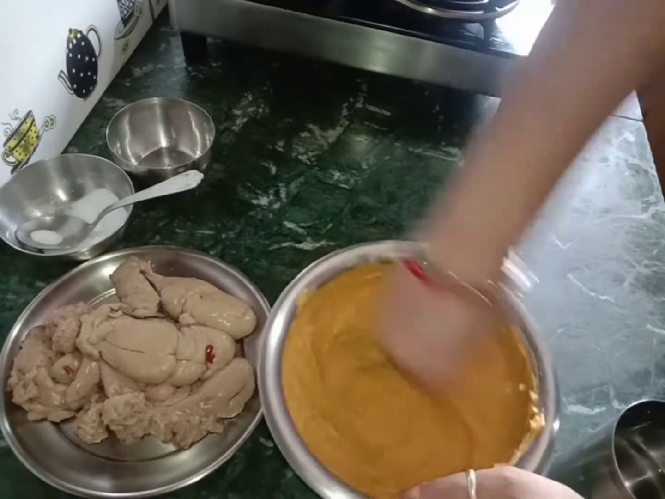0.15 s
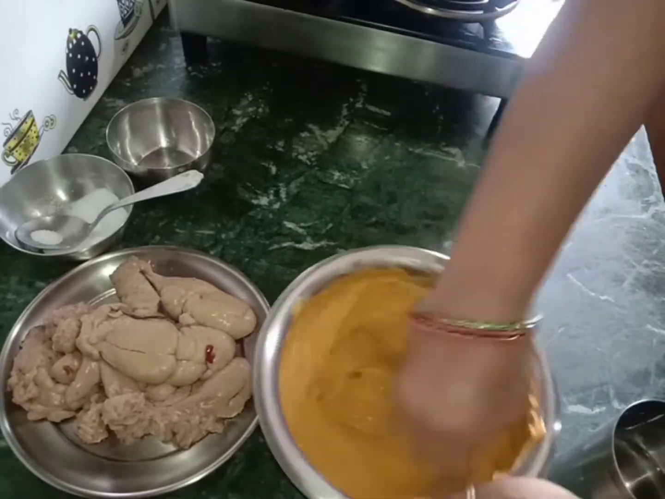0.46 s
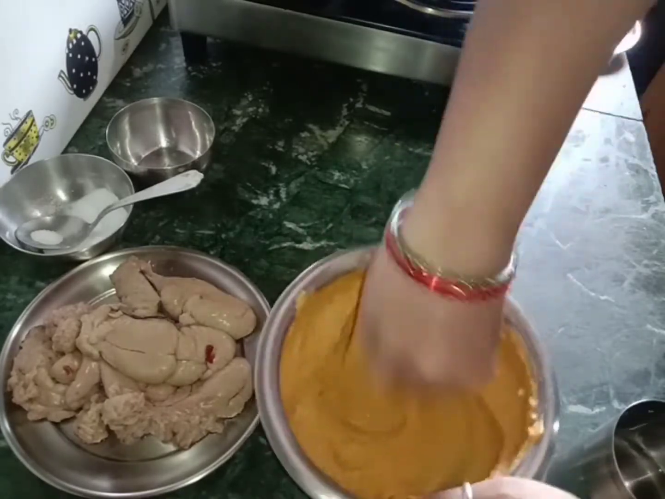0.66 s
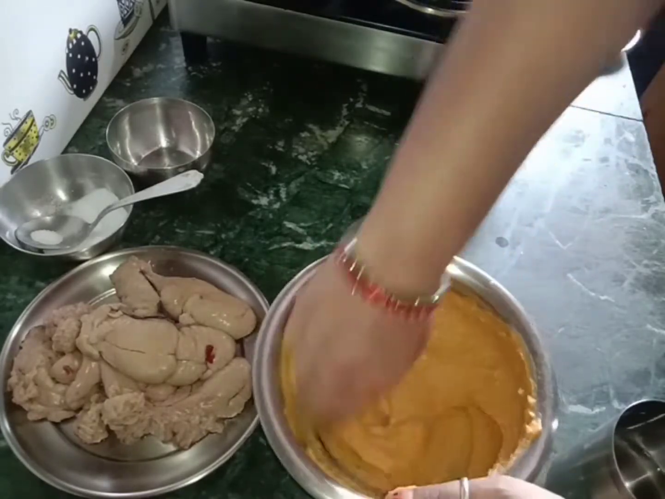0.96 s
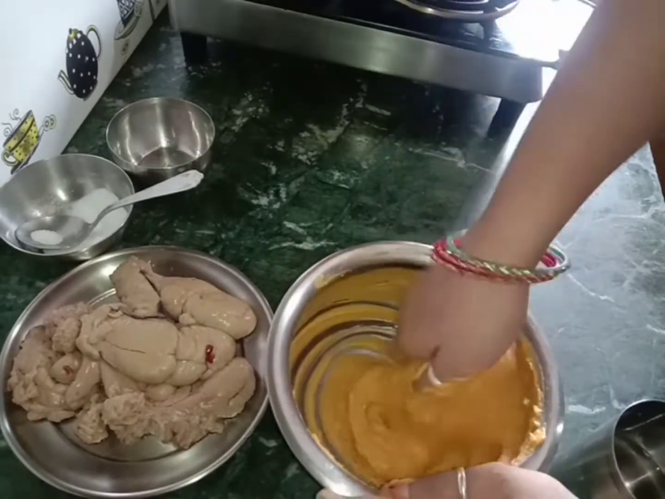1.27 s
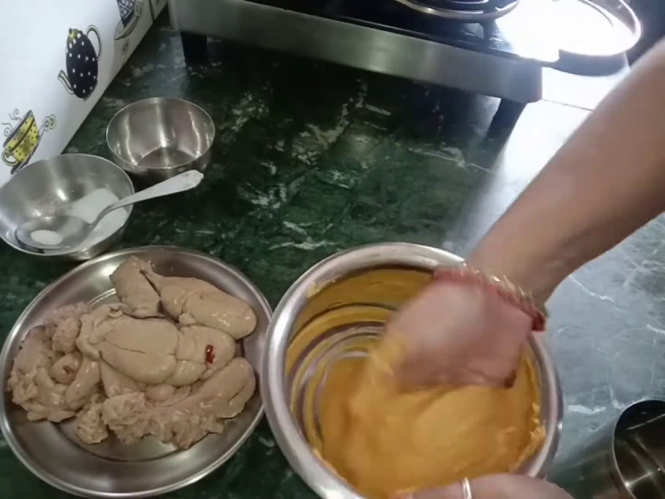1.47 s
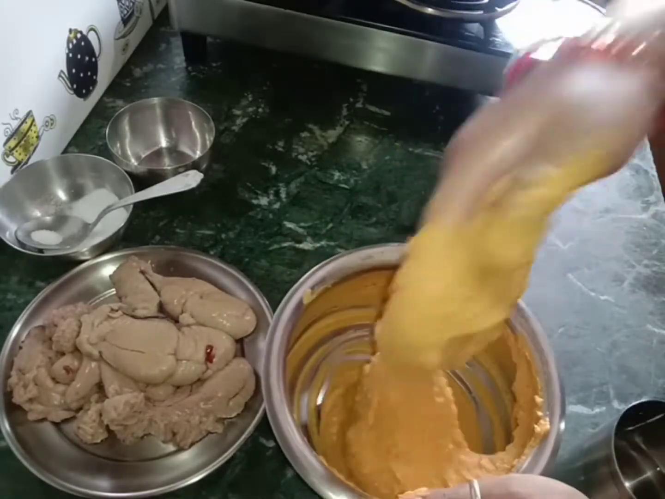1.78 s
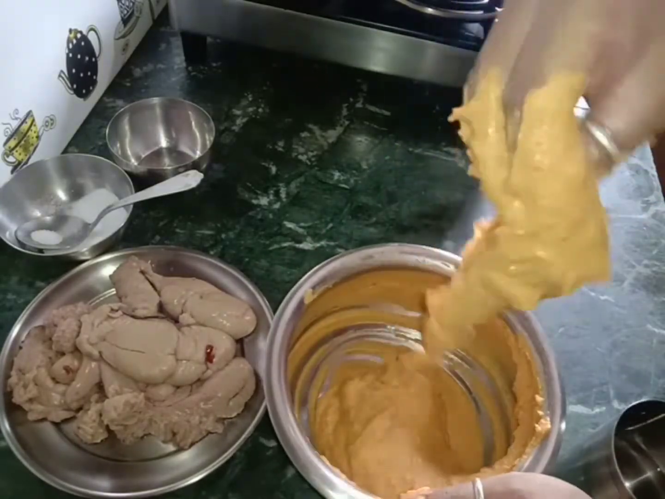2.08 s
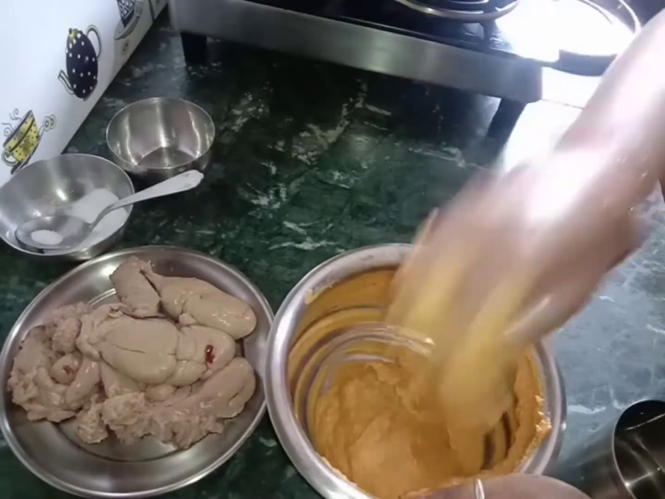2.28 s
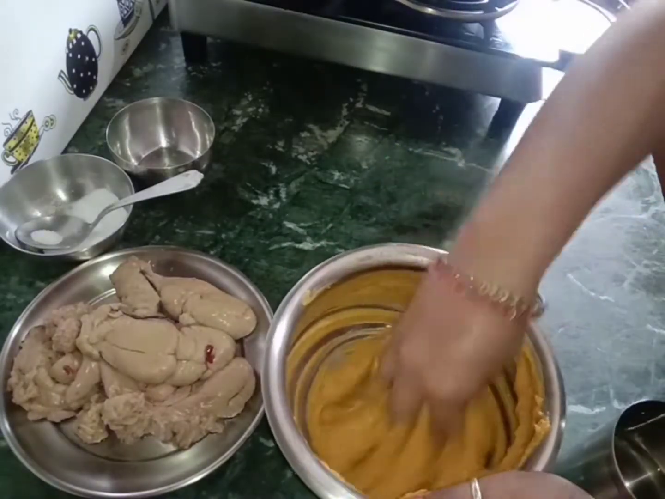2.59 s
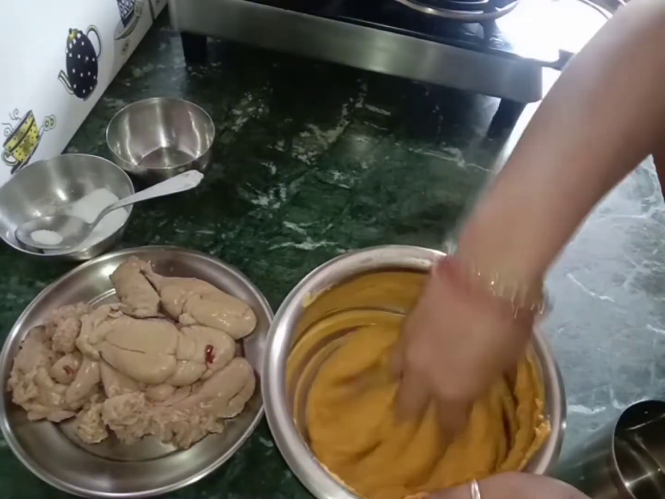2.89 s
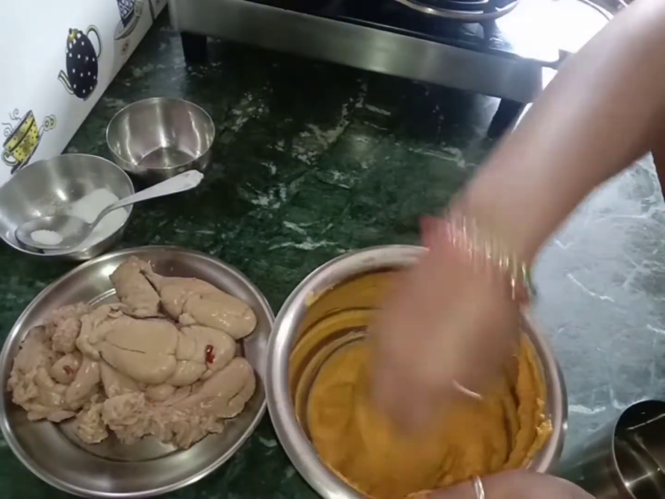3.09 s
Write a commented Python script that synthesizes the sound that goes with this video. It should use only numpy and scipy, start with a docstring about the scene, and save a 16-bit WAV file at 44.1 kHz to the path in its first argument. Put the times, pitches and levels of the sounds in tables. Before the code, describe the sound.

Thick batter is beaten by hand in a steel bowl, close and near-mono in a small kitchen with a short tail. Over unsteady room noise and swelling low hum, faint swishes give way to small wet clicks from 0.35 s, sharper near 0.9 and 1.05. At 1.35 the bowl knocks and chatters on stone. After quieter smacks, hard bright knocks hit at 2.5 and 2.8, then a heavy, hollow palm slap at 3.07.

```python
"""Thick batter is beaten by hand in a steel bowl on a stone counter in a small kitchen, heard near-mono.
Over wavering room noise and a low swelling hum (noise through resonances), the hand drags faint swishes.
Smacks (bursts of noise) click from 0.35 s; near 1.35 s the bowl knocks (ringing modes) and chatters on stone.
Harder knocks and chatter come at 2.5 and 2.8 s, then the strongest palm slap (damped pops) at 3.07 s.
Close sounds feed a short diffuse kitchen tail, and the microphone rounds the peaks."""
import sys
import numpy as np
from scipy import signal
from scipy.fft import rfft, irfft
from scipy.io import wavfile

SR = 44100
rng = np.random.default_rng(int(sys.argv[2]) if len(sys.argv) > 2 else 0)


def master_out(mix):
    """Clip the mix to full scale and print it as 16-bit PCM to the path in sys.argv[1]."""
    frames = np.transpose(np.atleast_2d(mix))
    ceiling = np.clip(frames, -1, 1)
    pcm = np.round(ceiling * 32767).astype(np.int16)
    wavfile.write(sys.argv[1], SR, pcm)


def magnitude_from_level(level_db):
    """Linear magnitude for a level in decibels (20 dB per decade)."""
    exponent = np.asarray(level_db, float) / 20
    return 10 ** exponent


N = 143325
SPAN = 13230   # samples of one event


def rms_one(x):
    """Scale to rms 1."""
    return x / np.sqrt(np.mean(x ** 2) + 1e-20)


def in_time(rows):
    """A (s, value) curve at every sample."""
    return np.interp(np.arange(N) / SR, *np.transpose(rows))


def at_hz(points, hz):
    """A (Hz, value) table read on a log frequency axis."""
    table_hz, values = np.transpose(points)
    return np.interp(np.log(np.maximum(hz, 1)), np.log(table_hz), values)


def colour(x, points):
    """Shape the spectrum by a (Hz, dB) table."""
    size = x.shape[-1]
    hz = np.arange(size // 2 + 1) * SR / size
    return irfft(rfft(x) * magnitude_from_level(at_hz(points, hz)), size)


def band(x, low_hz, high_hz):
    """Keep only what lies between two frequencies."""
    return signal.sosfilt(signal.butter(2, [low_hz, high_hz], "band", fs=SR, output="sos"), x)


def treble(x):
    """Keep only what lies above 2000 Hz, the range of cracks, hisses and smacks."""
    return signal.sosfilt(signal.butter(2, 2000, "high", fs=SR, output="sos"), x)


def drift(rate_hz):
    """Slow random wandering of spread 1, made at every 40th sample and joined by lines."""
    r = np.exp(-80 * np.pi * rate_hz / SR)
    noise = rng.standard_normal(N // 40 + 2002)
    slow = signal.lfilter([1], [1, -2 * r, r * r], noise)[2000:]   # past the filter's start
    return np.interp(np.arange(N) / 40, np.arange(len(slow)), rms_one(slow - slow.mean()))


def ring(clicks, hz, t60):
    """A damped resonance: a unit click sets a sine of about height 1 ringing, down 60 dB in t60."""
    r, w = magnitude_from_level(-60 / (t60 * SR)), 2 * np.pi * hz / SR
    return signal.lfilter([0, np.sin(w)], [1, -2 * r * np.cos(w), r * r], clicks + 1e-18)


def resonant_noise(size, hz, width_hz, second):
    """Noise through one resonance twice, the second pass with its decay time scaled by `second`."""
    t60 = np.log(1000) / np.pi / width_hz
    return ring(ring(rng.standard_normal(size), hz, t60), hz, t60 * second)


def dying(t60, size=SPAN):
    """An exponential fall of 60 dB in t60."""
    return magnitude_from_level(-60 * np.arange(size) / SR / max(t60, .001))


def add(out, s, sound, room_db):
    """Lay a fading sound into the direct row and, offset by room_db, into the row sent to the room."""
    i = int(s * SR)
    size = min(len(sound), N - i)
    faded = sound * np.linspace(1, 0, len(sound))
    out[:, i:i + size] += faded[:size] * magnitude_from_level(np.array([[0], [room_db]]))


def air():
    """Room noise in overlapping half-octave patches whose levels flicker; above 1500 Hz it also swells."""
    # spectrum of the room noise: hz, relative level_db (per Hz)
    air_spectrum = [(30, -22.5), (70, -10.5), (130, -2.5), (240, -13), (700, -14), (1220, -20.5),
                    (3000, -29.5), (7300, -32), (8500, -48.5), (10500, -53.5), (13500, -56.5), (15000, -44),
                    (16000, -54)]
    # swell of its treble: time_s, relative level_db
    treble_swell = [(0, 4.5), (.15, 5.5), (.35, 1.6), (1.2, 0), (2.2, -3), (2.7, 5.5), (3.0, 9), (3.25, -3)]
    level_db, flicker_db, flicker_hz = -51.5, 3.5, 10.0
    noise = rms_one(colour(rng.standard_normal(N + N % 2), air_spectrum))[:N]
    spectrum = rfft(noise)
    hz = np.maximum(np.arange(N // 2 + 1) * SR / N, 30)
    swell_db = in_time(treble_swell)
    out = 0
    for centre_hz in 30 * 2. ** np.arange(0, 10, .5):
        share = np.clip(1 - 2 * abs(np.log2(hz / centre_hz)), 0, 1)
        patch_db = flicker_db * drift(flicker_hz) + (swell_db if centre_hz > 1500 else 0)
        out = out + irfft(spectrum * share, N) * magnitude_from_level(patch_db)
    return out * magnitude_from_level(level_db)


def drones():
    """Noise twice through narrow resonances; the hum near 148 Hz swells on a curve, the others waver."""
    # resonances in the room noise, low to high: pitch_hz, width_hz, level_db (rms before wavering)
    resonances = [(96.6, 4.8, -58), (147.9, 17.3, -53.5), (1247, 108, -60.5), (2150, 30, -70.5),
                  (6030, 57, -79)]
    # swell of the hum, only its shape is used: time_s, level_db
    hum_swell = [(0, -65), (.09, -38.5), (.22, -72.5), (.42, -40.5), (.53, -55.5), (.68, -41.5), (.8, -47),
                 (1.0, -70.5), (1.15, -46), (1.25, -57.5), (1.42, -42.5), (1.62, -73.5), (1.74, -44.5),
                 (1.88, -49), (2.2, -65), (2.5, -46.5), (2.75, -55.5), (3.0, -43.5), (3.25, -51)]
    waver_db, waver_hz = 3.5, 5.7
    hum_hz, hum_db = resonances[1][0], in_time(hum_swell)
    out = 0
    for hz, width_hz, db in resonances:
        tone = rms_one(resonant_noise(N + SR, hz, width_hz, .5)[SR:])   # past the build-up
        change_db = hum_db - hum_db.mean() if hz == hum_hz else waver_db * drift(waver_hz)
        out = out + tone * magnitude_from_level(db + change_db)
    return out


def kitchen(x):
    """A diffuse tail after 3 ms: octave bands of noise, each dying at its own rate."""
    # decay of the kitchen: hz, t60_s
    room_decay = [(300, 0.24), (1300, 0.31), (5510, 0.37), (14600, 0.1)]
    tail = 0
    for hz in 110 * 2. ** np.arange(8):
        noise = band(rng.standard_normal(22050), hz / 2 ** .5, hz * 2 ** .5)
        tail = tail + noise * dying(at_hz(room_decay, hz), size=22050)
    tail = np.append(np.zeros(int(.003 * SR)), tail / np.sqrt(np.sum(tail ** 2)))
    return 2 * signal.fftconvolve(x, tail)[:N]


def swishes():
    """Narrow noise swells: noise twice through one resonance, swelling and fading. Most are the hand's faint
    drags through batter; the brief bright ones near 0.78 s and 2.24-2.27 s ring and hiss sharply."""
    # faint swishes and brief bright rings: middle_s, length_s, centre_hz, width_hz, level_db (rms before the
    # fades)
    swells = [(.15, .09, 2800, 300, -62), (.12, .2, 2200, 120, -64), (.03, .12, 3550, 50, -63),
              (1.46, .025, 3900, 150, -49), (1.87, .14, 4090, 100, -69), (.783, .006, 4500, 700, -47),
              (2.24, .024, 4450, 250, -53), (2.236, .016, 8000, 1500, -53), (2.27, .012, 7200, 1800, -47),
              (2.72, .09, 4500, 500, -59)]
    out, t = 0, np.arange(N) / SR
    for s, length, hz, width_hz, db in swells:
        swish = rms_one(resonant_noise(N, hz, width_hz, 1))
        swell = np.exp(-.5 * (2 * (t - s) / length) ** 4)
        out = out + magnitude_from_level(db) * swish * swell
    return out


def bowl(clicks, focus_hz, fall_db):
    """Clicks ring all modes of the damped bowl, favouring those near the focus by fall_db per octave."""
    # modes of the bowl: pitch_hz, relative level_db, t60_s
    modes = [(890, -9.5, 0.084), (1249, -2.5, 0.053), (2146, -22, 0.28), (2686, 1.6, 0.02),
             (3180, -9, 0.033), (4430, -18, 0.033), (5450, -16.5, 0.031), (6090, -19.5, 0.011),
             (6214, -9.5, 0.011), (7160, -12.5, 0.037), (7660, -11, 0.046), (8700, -11.5, 0.066)]
    detune = .007   # spread of the modes' random relative shift, drawn anew for each knock or spell of chatter
    out = 0
    for hz, db, t60 in modes:
        luck_db, shift = rng.normal(0, 1, 2)
        mode_db = db - fall_db * abs(np.log2(hz / focus_hz)) + luck_db
        out = out + magnitude_from_level(mode_db) * ring(clicks, hz * (1 + detune * shift), t60)
    return out


def chatter():
    """The bowl chatters on the stone: dense uneven touches ring it and hiss; they hold, then die."""
    # spells of chatter: start_s, hold_s, release_t60_s, level_db, focus_hz, hiss_db (against the ringing)
    spells = [(1.3435, 0.028, 0.09, -31.5, 5460, 0), (1.382, 0.02, 0.21, -31.5, 7660, 2),
              (2.51, 0.04, 0.12, -38.5, 4430, 3), (2.832, 0.064, 0.18, -33, 5970, -3)]
    touches_per_s, spread_db, lumps_db, fall_db, room_db = 3300, 2.5, 2, 3, -21.5
    out, t = np.zeros((2, N)), np.arange(SPAN) / SR
    for s, hold, t60, db, focus_hz, hiss_db in spells:
        touches = (rng.random(SPAN) < touches_per_s / SR) * rng.choice([-1, 1], SPAN)
        touches = touches * magnitude_from_level(spread_db * np.minimum(rng.exponential(1, SPAN), 4))
        touches = touches * magnitude_from_level(lumps_db * drift(40)[:SPAN])   # their strength wanders
        ringing = rms_one(bowl(touches, focus_hz, fall_db))
        hiss = magnitude_from_level(hiss_db) * rms_one(treble(touches))
        rise = np.minimum(t / .003, 1)
        release = magnitude_from_level(db - 60 * np.maximum(t - hold, 0) / t60)
        add(out, s, (ringing + hiss) * rise * release, room_db)
    return out


def knocks():
    """The bowl knocks the counter: a click rings its modes, with a noise crack, weaker for steep falls."""
    # knocks: start_s, level_db, focus_hz, fall_db (per octave), room_db (send against direct)
    hits = [(0.428, -31.5, 1250, 22, -6), (0.679, -25.5, 900, 10.5, -6.5), (1.348, -12, 1250, 12, -22),
            (1.3518, -17, 1250, 17, -14), (1.356, -8, 890, 30, -6), (2.498, -3, 2940, 6, -14),
            (2.5071, -17, 7050, 0, -20), (2.807, -4, 3530, 3.5, -15.5), (3.0687, -11.5, 1280, 15, -17.5)]
    crack_db, crack_t60_s = 10.5, .016
    out, click = np.zeros((2, N)), signal.unit_impulse(SPAN)
    for s, db, focus_hz, fall_db, room_db in hits:
        crack = treble(rng.standard_normal(SPAN) * dying(crack_t60_s)) * magnitude_from_level(crack_db - 2 * fall_db)
        add(out, s, magnitude_from_level(db) * (bowl(click, focus_hz, fall_db) + crack) / 2, room_db)
    return out


def slaps():
    """The palm slaps the batter and trapped air pops: each pop is a quickly damped resonance."""
    # pops: start_s, level_db, pitch_hz, t60_s, room_db (send against direct)
    pops = [(0.004, -40.5, 776, 0.032, 2), (2.7853, -19.5, 2310, 0.018, -27),
            (1.350, -36.5, 470, 0.077, 3.5), (1.711, -26, 144, 0.1, -39), (2.787, -23, 947, 0.026, -11),
            (2.793, -16, 596, 0.012, -5.5), (2.800, -17, 447, 0.04, -46), (3.0697, -1.5, 426, 0.016, -17.5),
            (3.0698, -41, 570, 0.039, -3), (3.0685, -20, 270, 0.014, -15),
            (3.0707, -12.5, 2330, 0.0075, -23)]
    out, click = np.zeros((2, N)), signal.unit_impulse(SPAN)
    for s, db, hz, t60, room_db in pops:
        add(out, s, magnitude_from_level(db) * ring(click, hz, t60), room_db)
    return out


def smacks():
    """Sticky batter smacks: short dying noise in a band, with a faint resonance at its centre."""
    # wet smacks: start_s, level_db, centre_hz, room_db (send against direct)
    wet_smacks = [(0.355, -42.5, 7900, -13), (0.4283, -31, 3870, -13), (0.6811, -35, 4830, -14),
                  (0.841, -28.5, 5750, -12), (0.846, -34, 5740, -12.5), (0.8715, -28, 7800, -23),
                  (0.8849, -19, 5100, -21), (0.891, -31, 7320, -11.5), (1.053, -19.5, 6370, -14),
                  (1.3667, -14, 7500, -41), (1.3914, -19, 4570, -39), (1.413, -23.5, 4480, -35),
                  (2.231, -23, 14000, -8.5), (2.347, -41.5, 8560, -28), (2.4797, -32.5, 7000, -5),
                  (2.486, -31, 5770, -26), (2.7914, -21.5, 4100, -8), (2.822, -30, 8700, -32),
                  (2.845, -24, 6000, -27), (3.0595, -33, 6160, -7.5), (3.0692, -16, 7000, -21),
                  (3.1302, -37, 6050, -16)]
    octaves, t60_s, rise_s = 1.56, .010, .0007
    pop_db, pop_t60_s = -19, .008
    out = np.zeros((2, N))
    shape = dying(t60_s) * np.minimum(np.arange(SPAN) / (rise_s * SR), 1)
    for s, db, hz, room_db in wet_smacks:
        low_hz, high_hz = np.clip(hz * 2 ** (np.array([-.5, .5]) * octaves), 100, .45 * SR)
        burst = band(rng.standard_normal(SPAN) * shape, low_hz, high_hz)
        burst = burst + magnitude_from_level(pop_db) * ring(burst, hz, pop_t60_s)
        height = np.sqrt(8 * np.mean(burst[:66] ** 2))   # rough peak, from the first 1.5 ms
        add(out, s, magnitude_from_level(db) * treble(burst) / height, room_db)
    return out


def scene():
    """Hand and bowl, their tail in the kitchen, and the background; the channels barely differ."""
    # microphone's colour of near sounds: hz, gain_db
    mic_colour = [(40, -28), (90, -6.5), (220, -7.5), (1500, -1), (1900, -6), (2500, -3), (6000, 5.5),
                  (7800, -1), (9000, -10), (12000, -13.5), (15000, -8), (15600, -8), (16500, -54)]
    # difference between the channels: hz, gain_db
    side_colour = [(60, -28), (180, -50), (1000, -33), (15000, -23.5)]
    direct, sent = smacks() + knocks() + chatter() + slaps()
    near = colour(np.append(direct + kitchen(sent), 0), mic_colour)[:N]   # padded to an even length
    mid = near + swishes() + air() + drones()
    late = np.append(np.zeros(45), mid[:-44])   # 1 ms late, one sample longer
    side = colour(late, side_colour)[:N]
    return np.array([mid + side, mid - side])


def band_limit(x):
    """A steep low-pass at the top of the band."""
    return signal.sosfilt(signal.butter(12, 16800, fs=SR, output="sos"), x)


def record(dry):
    """The microphone cuts the lowest bass and rounds the peaks."""
    low_cut_hz, ceiling = 25, .42
    x = signal.sosfilt(signal.butter(4, low_cut_hz, "high", fs=SR, output="sos"), dry)
    rounded = ceiling * np.tanh(x / ceiling)
    return band_limit(rounded)


dry = scene()
out = record(dry)
master_out(out)
```